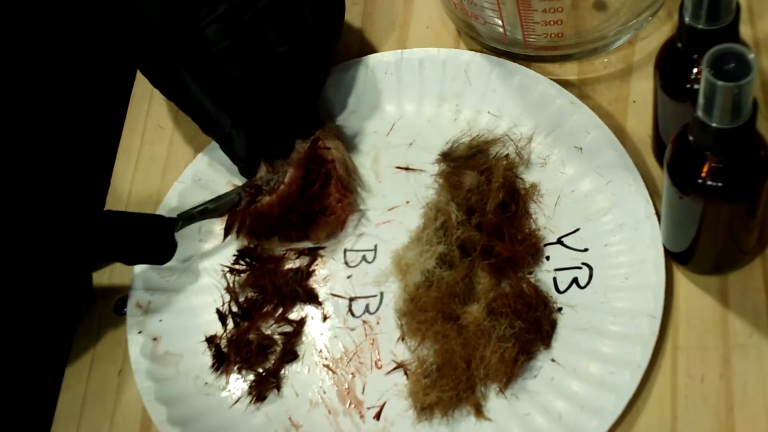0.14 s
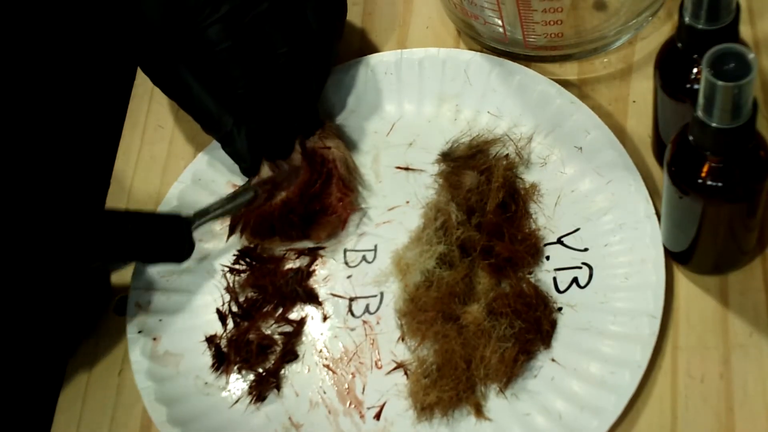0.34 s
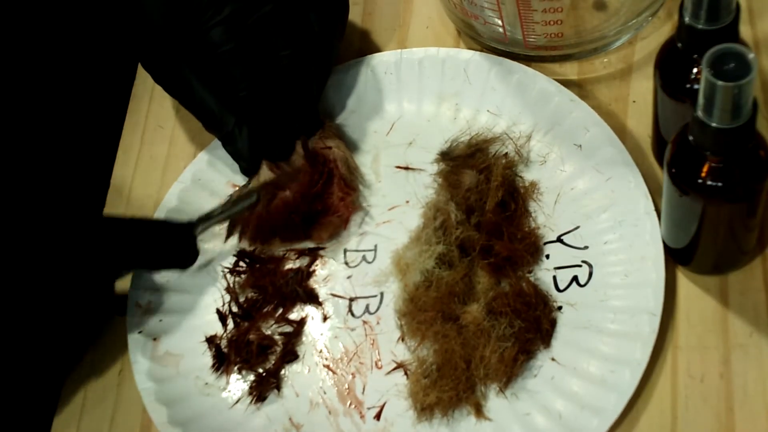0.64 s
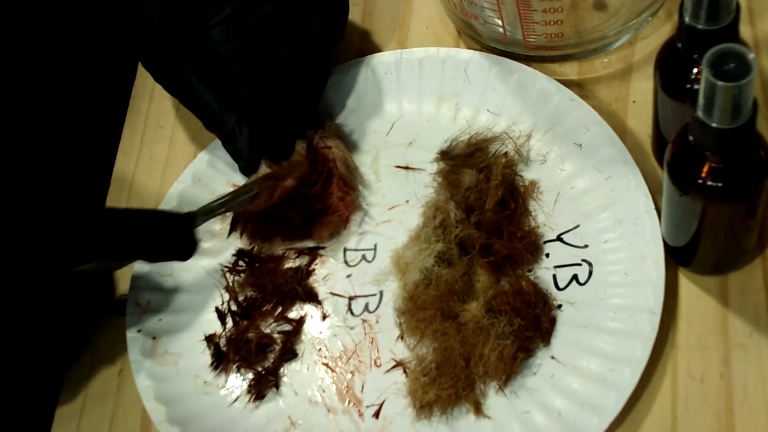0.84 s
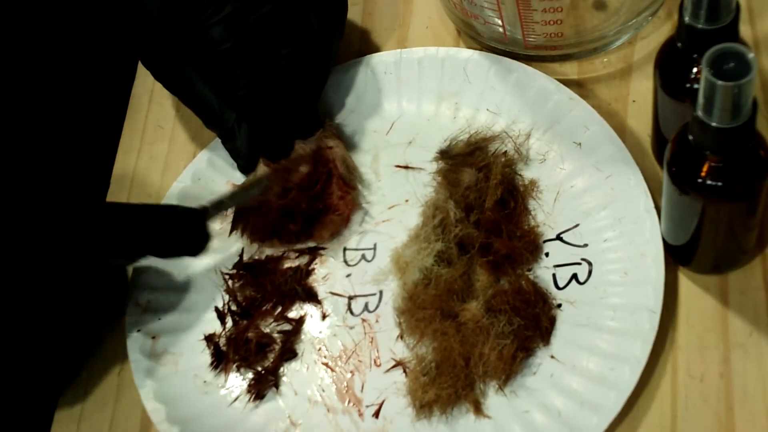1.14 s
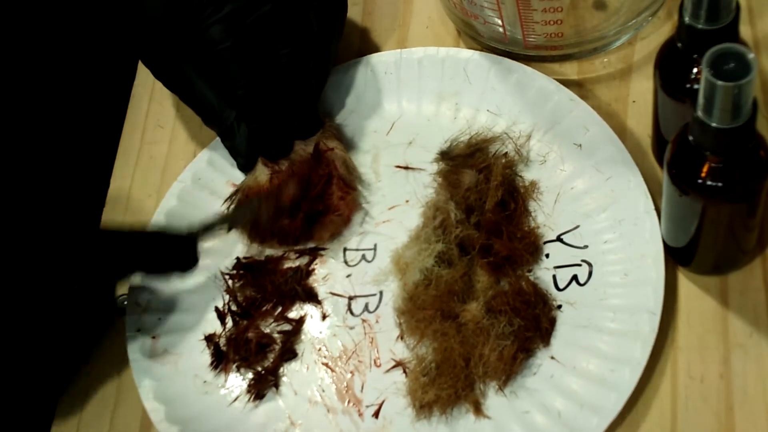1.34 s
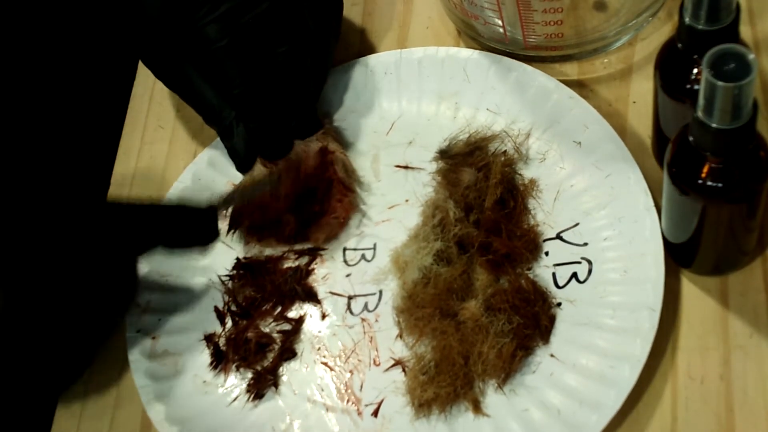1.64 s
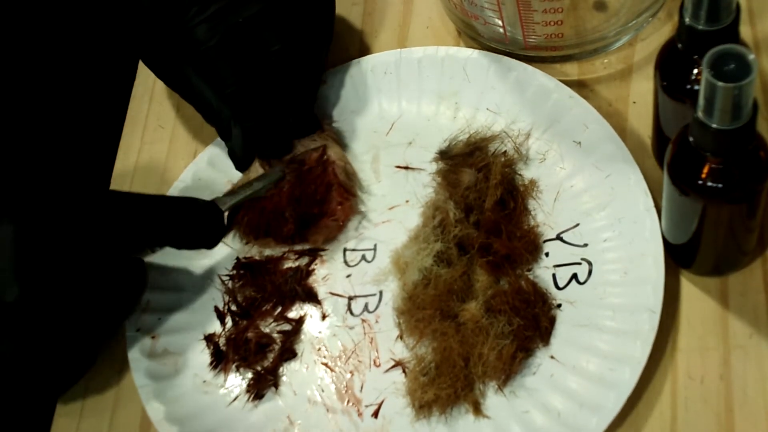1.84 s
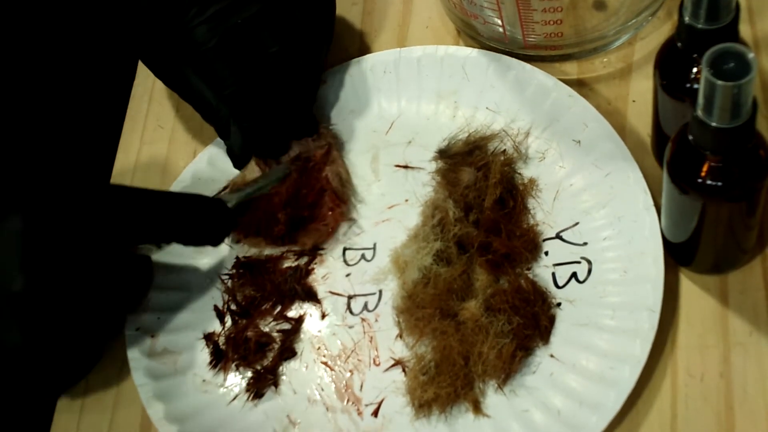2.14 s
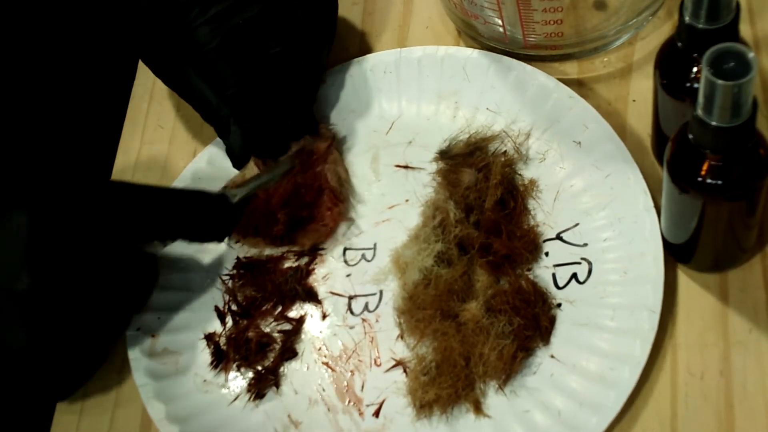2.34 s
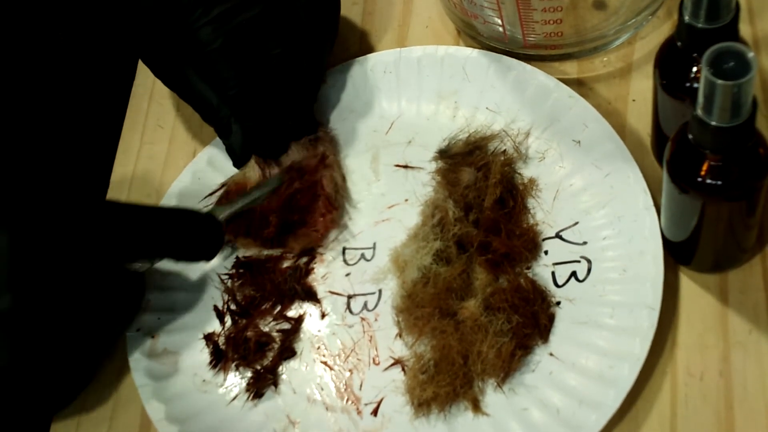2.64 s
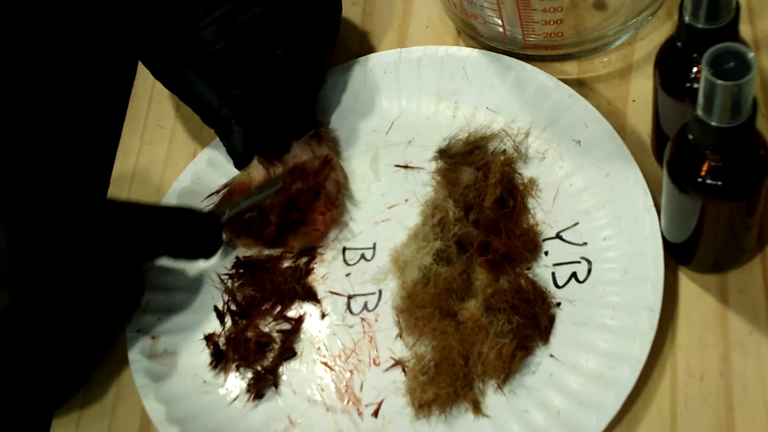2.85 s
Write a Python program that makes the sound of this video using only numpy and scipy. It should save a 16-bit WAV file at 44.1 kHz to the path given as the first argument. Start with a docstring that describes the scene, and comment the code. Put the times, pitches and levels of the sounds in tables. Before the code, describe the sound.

Short raspy sawing strokes, about three or four a second, as a blade slices hair against a paper plate; tiny strands snap between them. Recorded close and indoors, over low room rumble and faint hiss.

```python
"""A knife saws through a tuft of hair on a paper plate, ten quick strokes, close to a small camera indoors.
Pressure and bite curves drive clumped noise grains through filters: scrape, fibres, plate rasp, edge hiss, steel.
Snaps and catches are single impulses through fixed filters; the microphone rings near 5 kHz.
A short room tail follows the knife; room rumble, amplifier hiss and a thin electrical whine lie underneath."""
import sys
import numpy as np
from scipy import signal
from scipy.fft import rfft, irfft
from scipy.io import wavfile
from scipy.ndimage import map_coordinates

SR = 44100
rng = np.random.default_rng(int(sys.argv[2]) if len(sys.argv) > 2 else 0)


def gain_from_db(level_db):
    """Convert decibel levels to linear amplitude factors (20 dB per decade)."""
    decades = np.asarray(level_db, float) / 20
    return 10 ** decades


def dump(signal):
    """Clip the signal to [-1, 1] and save it as 16-bit WAV at the path in sys.argv[1]."""
    limited = np.clip(np.atleast_2d(signal).T, -1, 1)
    pcm = np.round(limited * 32767).astype(np.int16)
    wavfile.write(sys.argv[1], SR, pcm)


N = 132300


def unit(x):
    """Scale to rms 1."""
    return x / np.sqrt(np.mean(x ** 2) + 1e-20)


def track(points):
    """Interpolate (time [s], value) points to one value per sample."""
    return np.interp(np.arange(N) / SR, *np.transpose(points))


def wobble(knots_per_s):
    """Smooth random curve through normal-distributed knots."""
    knots = rng.standard_normal(int(N * knots_per_s / SR) + 4)
    return map_coordinates(knots, [np.arange(N) * knots_per_s / SR])


def coloured(x, spectrum):
    """Minimum-phase filter through (frequency [Hz], level [dB]) points; keeps the rms of white noise."""
    size = 4096
    point_hz, point_db = np.transpose(spectrum)
    bin_hz = np.fft.rfftfreq(size, 1 / SR)
    gain_db = np.interp(np.log(bin_hz + 1), np.log(point_hz + 1), np.maximum(point_db, -80))
    cepstrum = irfft(np.log(gain_from_db(gain_db)), size)
    # fold to the causal side
    cepstrum[1:size // 2] *= 2
    cepstrum[size // 2 + 1:] = 0
    response = irfft(np.exp(rfft(cepstrum)), size)
    return signal.fftconvolve(x, response / np.linalg.norm(response))[:N]


# room rumble spectrum: (frequency [Hz], relative level [dB per Hz])
RUMBLE_SPECTRUM = [(8.8, -41), (15, -2), (40, 0.5), (112, -4), (405, -19), (461, -18.5), (609, -23.5),
                   (692, -24), (895, -26.5), (1180, -29), (2500, -35), (3250, -55), (5500, -120)]
RUMBLE_DB, RUMBLE_SWAY_DB = -56.5, 1.2


def rumble():
    """Low-weighted room noise whose level sways slowly."""
    noise = unit(coloured(rng.standard_normal(N), RUMBLE_SPECTRUM))
    return gain_from_db(RUMBLE_DB + RUMBLE_SWAY_DB * wobble(3.27)) * noise


# amplifier hiss spectrum: (frequency [Hz], relative level [dB per Hz])
HISS_SPECTRUM = [(800, -6.5), (2500, -2), (4000, 2.5), (4900, 6.5), (5800, -2), (9000, -3.5), (15600, -4.5)]
HISS_RMS_DB = -68.5


def amplifier_hiss():
    """Steady filtered white noise."""
    return gain_from_db(HISS_RMS_DB) * coloured(rng.standard_normal(N), HISS_SPECTRUM)


WHINE_HZ, FLIPS_PER_S, WHINE_RMS_DB = 7867.3, 59.94, -77


def whine():
    """Electrical sine that reverses polarity at every flip."""
    t = np.arange(N) / SR
    flips = np.sign(np.sin(np.pi * FLIPS_PER_S * t + 2 * np.pi * rng.random()))
    return np.sqrt(2) * gain_from_db(WHINE_RMS_DB) * flips * np.sin(2 * np.pi * WHINE_HZ * t)


ROOM_T60_S, ROOM_DB = .1, -13  # level relative to the direct knife


def room(x):
    """Short diffuse answer of table and walls: exponentially decaying noise."""
    t = np.arange(SR // 4) / SR
    tail = rng.standard_normal(len(t)) * gain_from_db(-60 * t / ROOM_T60_S)
    return gain_from_db(ROOM_DB) * signal.fftconvolve(x, tail / np.linalg.norm(tail))[:N]


KICK_GAIN_DB = 7  # added to every snap and catch


def kicks(time_s, level_db):
    """One impulse at each time."""
    return np.bincount(np.round(time_s * SR).astype(int), gain_from_db(level_db + KICK_GAIN_DB), N)


# edge catching on the plate, before KICK_GAIN_DB:
# (time [s], level [dB], click re ring [dB], knock re ring [dB])
CATCHES = [(1.542, -34, -8, -22), (1.5428, -40, -6, -22), (2.0296, -28, -19, -15), (2.0322, -28, -23, -15),
           (2.5955, -36, -18, -12), (2.6105, -37, -20, -10), (2.8978, -35, -12, -18)]
# microphone ring near 5 kHz: (frequency [Hz], relative level [dB])
RING_SPECTRUM = [(2500, -55), (4000, -21), (4450, -11), (4620, -2.5), (4760, -3.5), (4900, 0), (5000, -2.5),
                 (5200, -8), (5500, -13), (6200, -24), (9000, -60)]
# broad click of a catch: (frequency [Hz], relative level [dB per Hz])
CLICK_SPECTRUM = [(700, -30), (2000, -8), (4000, 0), (6300, 0), (8000, -9), (15500, -12)]
# plate knock of a catch: (frequency [Hz], relative level [dB per Hz])
KNOCK_SPECTRUM = [(1200, -35), (1900, -12), (2200, 0), (2500, -8), (3200, -30)]


def catches():
    """Each catch kicks the ring, a broad click and a plate knock."""
    time_s, level_db, click_db, knock_db = np.transpose(CATCHES)
    ring = coloured(kicks(time_s, level_db), RING_SPECTRUM)
    click = coloured(kicks(time_s, level_db + click_db), CLICK_SPECTRUM)
    knock = coloured(kicks(time_s, level_db + knock_db), KNOCK_SPECTRUM)
    return ring + click + knock


# single strands that snap or tick on the plate, before KICK_GAIN_DB: (time [s], level [dB])
SNAPS = [(0.113, -56), (0.1999, -44), (0.22, -44), (0.2448, -56), (0.2791, -32), (0.382, -47),
         (0.3875, -52), (0.401, -42), (0.4539, -45), (0.4605, -48), (0.4696, -40), (0.4785, -48),
         (0.486, -48), (0.5112, -30), (0.5269, -29), (0.7986, -38), (1.0884, -33), (1.1059, -39),
         (1.3583, -47), (1.3778, -38), (1.6032, -47), (1.6152, -55), (1.6566, -26), (1.6827, -30),
         (1.6934, -26.5), (1.7284, -36), (1.8956, -43), (1.9148, -37.5), (1.926, -36), (1.986, -34),
         (2.0028, -32), (2.0154, -34), (2.2235, -33), (2.2625, -21), (2.2792, -37), (2.2894, -23),
         (2.3491, -49), (2.4972, -28), (2.5222, -26), (2.7711, -26.5), (2.8047, -23), (2.8122, -25),
         (2.908, -47), (2.9474, -55)]
# breaking fibres: (frequency [Hz], relative level [dB per Hz])
FIBRE_SPECTRUM = [(1000, -37.5), (1600, -16.5), (2200, -10.5), (3000, -9.5), (3450, -3.5), (4100, 4),
                  (4450, 4.5), (4900, 3.5), (5500, -11.5), (6300, 1.5), (6650, -5.5), (6950, -8),
                  (8000, -38), (16500, -86.5)]
# plate rasp: (frequency [Hz], relative level [dB per Hz])
PLATE_SPECTRUM = [(150, -36), (250, 5), (370, -18.5), (500, 1.5), (650, -7), (900, -4.5), (1500, -3),
                  (2200, -3), (2900, -9), (4800, -91)]
# edge hiss: (frequency [Hz], relative level [dB per Hz])
EDGE_SPECTRUM = [(5000, -15), (6800, -31), (7300, -2), (8100, -5.5), (8700, -8), (9800, -12), (10200, -15),
                 (10600, -6), (11000, -12), (11800, -16.5), (13800, -21), (15500, -45)]
SNAP_FIBRES_DB, SNAP_PLATE_DB, SNAP_EDGE_DB = -7, -24, -24  # re ring


def snaps():
    """Each snap kicks the ring and the fibre, plate and edge resonances at once."""
    impulses = kicks(*np.transpose(SNAPS))
    ring = coloured(impulses, RING_SPECTRUM)
    fibres = gain_from_db(SNAP_FIBRES_DB) * coloured(impulses, FIBRE_SPECTRUM)
    plate = gain_from_db(SNAP_PLATE_DB) * coloured(impulses, PLATE_SPECTRUM)
    edge = gain_from_db(SNAP_EDGE_DB) * coloured(impulses, EDGE_SPECTRUM)
    return ring + fibres + plate + edge


# steel modes of the blade: (frequency [Hz], relative level [dB], t60 [s])
BLADE_MODES = [(2220, -12, .06), (2510, -14, .06), (3400, -7, .06), (3540, -5, .07), (3810, -6, .06),
               (4120, -5, .06), (4350, -6, .05), (4660, 0, .06), (4890, 0, .07), (5400, -4, .05),
               (6010, -6, .05), (8660, -14, .04), (10600, -17, .02)]


def blade(x):
    """Steel rings briefly: a sum of decaying sine modes."""
    t = np.arange(SR // 8) / SR
    response = sum(gain_from_db(db - 60 * t / t60_s) * np.sin(2 * np.pi * hz * t) for hz, db, t60_s in BLADE_MODES)
    return signal.fftconvolve(x, response / np.linalg.norm(response))[:N]


FULL_DB, SPARSEST = -50, .12  # breaks thin out below this pressure, down to this share
GRAINS_PER_S, GRAIN_SPREAD_DB, BIGGEST_SPREADS = 3300, 2.3, 2.5  # rate at full density; cap on size
SMOOTH_SHARE = .45  # power share of smooth scrape at full density
CLUMP_DB, CLUMP_KNOTS_PER_S = 2.1, 190  # common to all rows
OWN_DB, OWN_KNOTS_PER_S = 1.5, 70  # drift of each row


def grains(pressure_db, count):
    """Rows of tiny uneven breaks over smooth scrape noise; rows share breaks and clumps, and drift apart."""
    chance, rarity, polarity = rng.random((3, N))
    density = np.clip(gain_from_db(pressure_db - FULL_DB), SPARSEST, 1)
    spreads = np.minimum(-np.log(rarity + 1e-9), BIGGEST_SPREADS)
    size = gain_from_db(GRAIN_SPREAD_DB * spreads) * np.sign(polarity - .5)
    probability = density * GRAINS_PER_S / SR
    breaks = unit(size) * (chance < probability) / np.sqrt(probability)
    smooth = SMOOTH_SHARE * density
    mix = np.sqrt(smooth) * rng.standard_normal((count, N)) + np.sqrt(1 - smooth) * breaks
    clumps_db = CLUMP_DB * wobble(CLUMP_KNOTS_PER_S)
    drift_db = OWN_DB * np.array([wobble(OWN_KNOTS_PER_S) for _ in range(count)])
    return unit(mix * gain_from_db(clumps_db + drift_db))


# blade pressure on hair and plate, one list a stroke with the rustle around it: (time [s], level [dB])
PRESSURE = [
    [(0.0, -78), (0.028, -74), (0.064, -88), (0.072, -70), (0.104, -91), (0.112, -67), (0.19, -80),
     (0.2, -65), (0.21, -82), (0.22, -55.5), (0.282, -49), (0.346, -65.5), (0.404, -65), (0.42, -72)],
    [(0.43, -66), (0.438, -76), (0.468, -61), (0.5, -56), (0.512, -58), (0.532, -44.5), (0.572, -45.5),
     (0.588, -63.5), (0.608, -47.5), (0.64, -85), (0.658, -68), (0.684, -88), (0.72, -83)],
    [(0.73, -88), (0.756, -69), (0.782, -66), (0.8, -47), (0.848, -43), (0.906, -51.5), (0.934, -91),
     (0.946, -65), (0.976, -88), (1.0, -88)],
    [(1.01, -73), (1.014, -76), (1.076, -62), (1.09, -43), (1.13, -44.5), (1.178, -52.5), (1.248, -91),
     (1.28, -88)],
    [(1.29, -91), (1.308, -83), (1.362, -48.5), (1.382, -41), (1.444, -60), (1.464, -63), (1.538, -64),
     (1.546, -62), (1.56, -65)],
    [(1.57, -73), (1.58, -82), (1.662, -37.5), (1.678, -44.5), (1.684, -45), (1.706, -55), (1.746, -51),
     (1.81, -88), (1.84, -86)],
    [(1.85, -81), (1.876, -65.5), (1.906, -64), (1.928, -48.5), (2.027, -45), (2.033, -34.5), (2.041, -52),
     (2.11, -93), (2.14, -81)],
    [(2.15, -90), (2.2, -59.5), (2.212, -72), (2.23, -42), (2.256, -40.5), (2.266, -34.5), (2.274, -39),
     (2.294, -35.5), (2.33, -60.5), (2.358, -50), (2.388, -102), (2.42, -83)],
    [(2.43, -82), (2.444, -67.5), (2.478, -64), (2.496, -45.5), (2.524, -34), (2.554, -42), (2.562, -39.5),
     (2.618, -50), (2.658, -101), (2.7, -72)],
    [(2.71, -70), (2.748, -61.5), (2.764, -55), (2.772, -48), (2.786, -41), (2.812, -32), (2.818, -46),
     (2.834, -41), (2.888, -56), (2.91, -54), (2.922, -74), (2.964, -80), (3.0, -65)],
]
# bite of the edge into the strands, one list a stroke: (time [s], level [dB])
BITE = [
    [(0.17, -99), (0.228, -72), (0.236, -77), (0.248, -63), (0.29, -59.5), (0.306, -62), (0.322, -78),
     (0.36, -80)],
    [(0.44, -89), (0.486, -83), (0.494, -77), (0.512, -55), (0.566, -49.5), (0.586, -55.5), (0.606, -57),
     (0.618, -70), (0.66, -80)],
    [(0.76, -81), (0.786, -76), (0.804, -51), (0.86, -47), (0.886, -52.5), (0.892, -51), (0.934, -76),
     (0.95, -81)],
    [(1.05, -85), (1.072, -94), (1.082, -54), (1.128, -46), (1.18, -56), (1.23, -105)],
    [(1.32, -78.5), (1.38, -52.5), (1.41, -48.5), (1.42, -49.5), (1.472, -67.5), (1.488, -77), (1.5, -73)],
    [(1.59, -82), (1.63, -59.5), (1.662, -51.5), (1.674, -54.5), (1.684, -49.5), (1.756, -65), (1.8, -97)],
    [(1.87, -75), (1.922, -72), (1.93, -58.5), (1.992, -59.5), (2.002, -62), (2.022, -73), (2.03, -51),
     (2.076, -99), (2.08, -93)],
    [(2.19, -67.5), (2.214, -81), (2.226, -59), (2.272, -52), (2.282, -57), (2.294, -50.5), (2.33, -81),
     (2.35, -62), (2.39, -93)],
    [(2.46, -73), (2.48, -83), (2.496, -57), (2.524, -47.5), (2.612, -55.5), (2.66, -107)],
    [(2.73, -71), (2.766, -62.5), (2.77, -52.5), (2.812, -45.5), (2.828, -49), (2.848, -52), (2.93, -82)],
]
# stroke colour: (middle time [s], plate rasp gain [dB], edge hiss gain [dB], fibre crunch gain [dB])
STROKES = [(.27, 1.5, 9.5, -3), (.56, 5, 5, 1.5), (.85, 0.5, 0, -3.5), (1.11, 2.5, -0.5, -0.9),
           (1.41, 5.5, 0, 0), (1.69, 2.5, -1, 1), (1.98, -1, -1, -3.5), (2.27, 2.5, 2.5, 1),
           (2.56, -1.5, 1, -2), (2.83, 1, 0, -2)]
REST_DB = -104  # bite level between strokes
FIBRES_DB, EDGE_DB, BLADE_DB = 5, -9, -3.5  # re bite, before stroke colour
PLATE_DB, PLATE_DB_PER_BITE_DB = -13, 0.92  # re bite at its peak; swing with it


def sawing():
    """Pressure drives the ringing scrape; bite drives breaking fibres, blade, plate rasp and edge hiss."""
    pressure_db = track([point for stroke in PRESSURE for point in stroke])
    bite_points = []
    for stroke in BITE:
        before, after = (stroke[0][0] - .01, REST_DB), (stroke[-1][0] + .01, REST_DB)
        bite_points += [before, *stroke, after]
    bite_db = track(bite_points)
    top_db = bite_db.max()

    middle_s, plate_db, edge_db, crunch_db = np.transpose(STROKES)
    plate_level_db = top_db + PLATE_DB_PER_BITE_DB * (bite_db - top_db) + PLATE_DB
    plate_gain = gain_from_db(plate_level_db + track(np.c_[middle_s, plate_db]))
    edge_gain = gain_from_db(bite_db + EDGE_DB + track(np.c_[middle_s, edge_db]))
    crunch_gain = gain_from_db(bite_db + FIBRES_DB + track(np.c_[middle_s, crunch_db]))

    steel, scrape, crunch, rasp, hiss = grains(pressure_db, count=5)
    ringing_scrape = coloured(scrape * gain_from_db(pressure_db), RING_SPECTRUM)
    fibres = coloured(crunch * crunch_gain, FIBRE_SPECTRUM)
    plate_rasp = coloured(rasp * plate_gain, PLATE_SPECTRUM)
    edge_hiss = coloured(hiss * edge_gain, EDGE_SPECTRUM)
    return ringing_scrape + fibres + plate_rasp + edge_hiss + blade(steel * gain_from_db(bite_db + BLADE_DB))


def scene():
    """Knife, its room answer and background, one channel."""
    knife = sawing() + snaps() + catches()
    background = rumble() + amplifier_hiss() + whine()
    return (knife + room(knife) + background)[None]


def roll_off(x):
    """The treble ends steeply here."""
    return signal.sosfilt(signal.butter(12, 15770, fs=SR, output="sos"), x)


def record(dry):
    """Turn the finished mix into the output signal."""
    return roll_off(dry)


dry = scene()
out = record(dry)
dump(out)
```